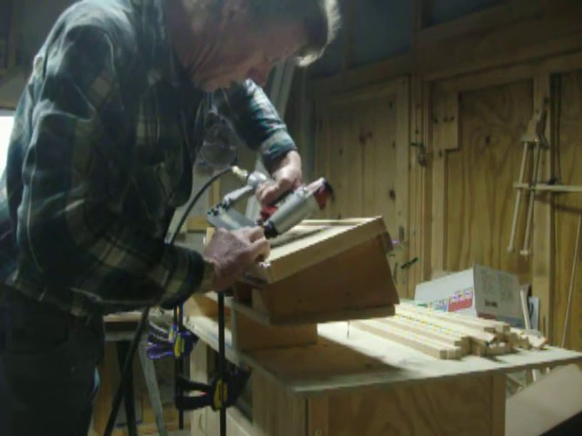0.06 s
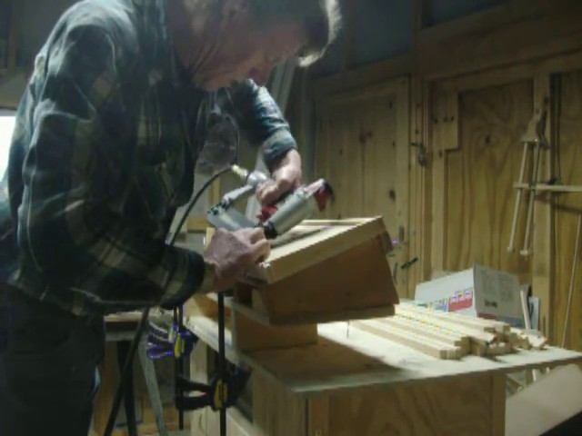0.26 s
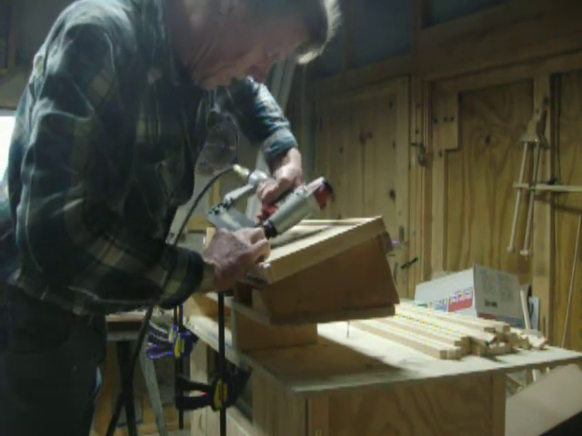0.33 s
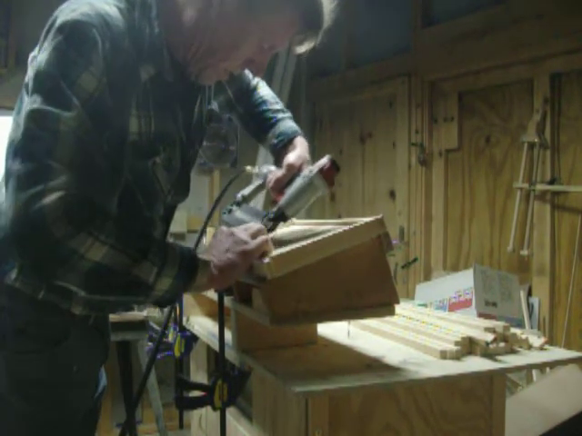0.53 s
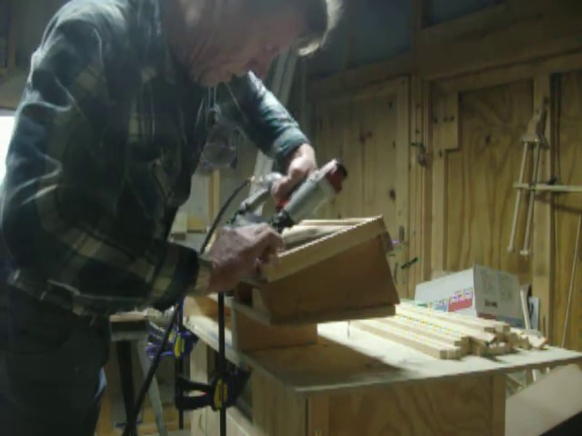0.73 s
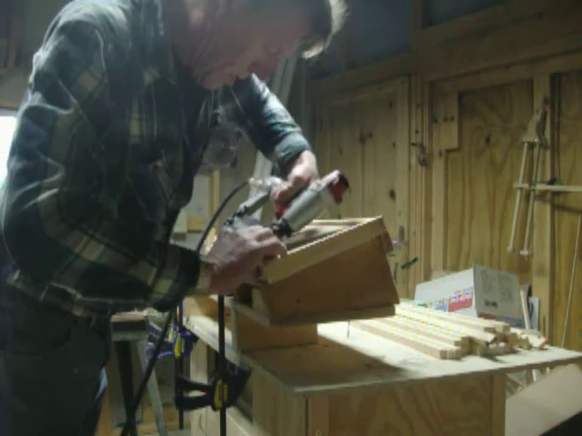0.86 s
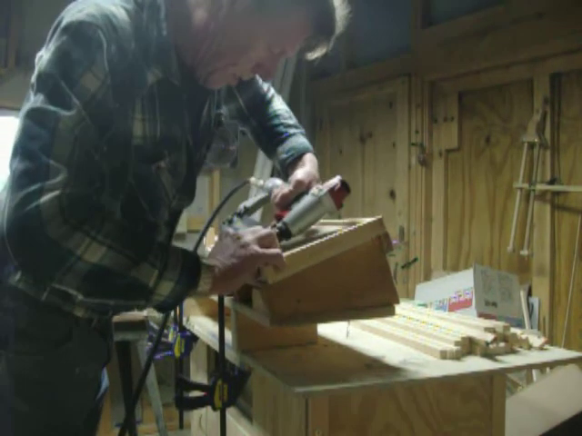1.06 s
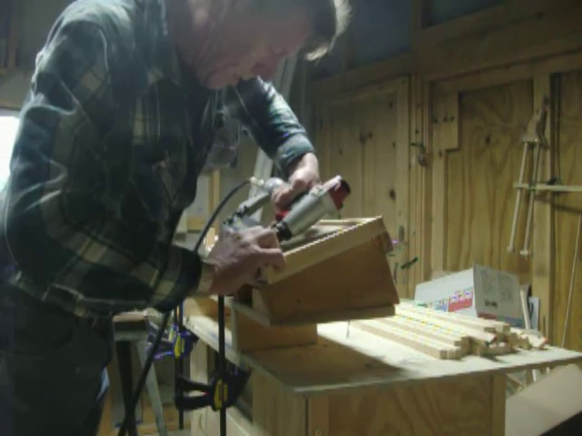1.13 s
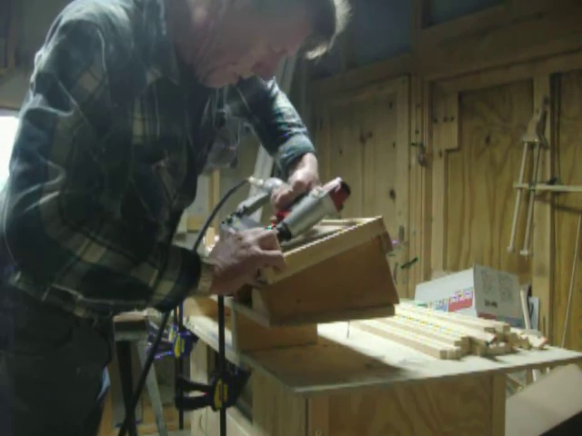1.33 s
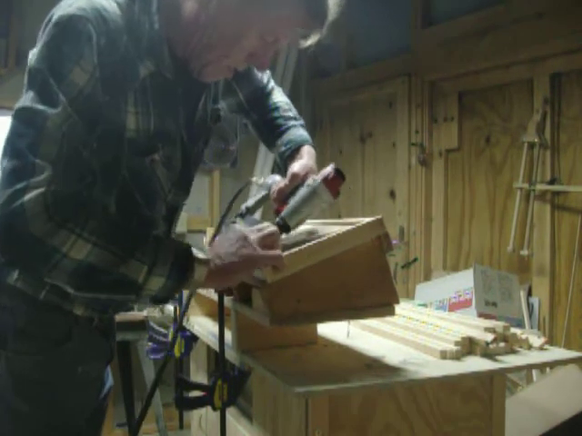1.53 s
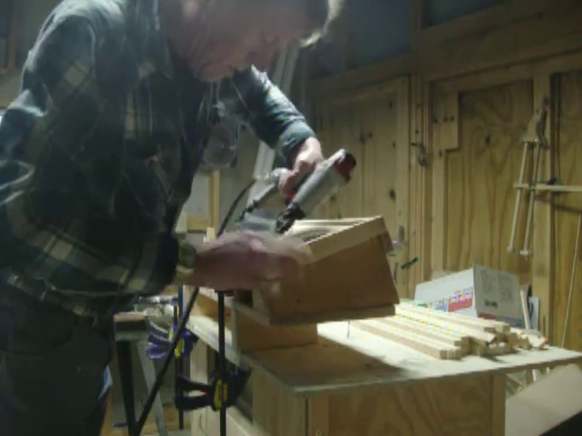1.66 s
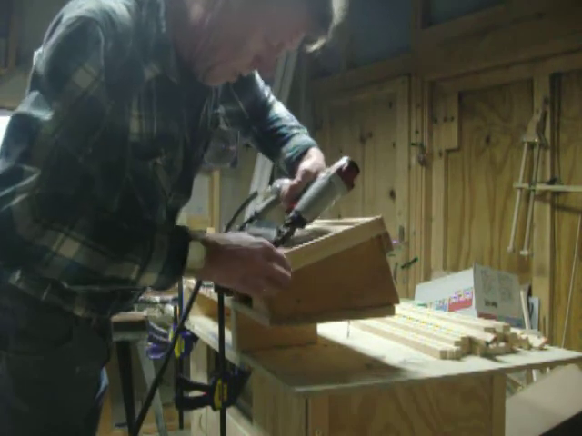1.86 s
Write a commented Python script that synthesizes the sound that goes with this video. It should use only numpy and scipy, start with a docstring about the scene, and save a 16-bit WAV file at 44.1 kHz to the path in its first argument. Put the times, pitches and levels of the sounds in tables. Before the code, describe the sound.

A pneumatic nailer fires two loud shots into a wooden frame, with scraping and knocks between

```python
"""Nailer in a plank-walled workshop

A pneumatic nailer fires twice into a wooden frame, close to a small camera's microphone.
Each shot is a jet of valve air (shaped noise), then the driver's blow (a short low ring and a noise crack);
on release the exhaust hisses and the piston bangs back. Between the shots the frame scrapes (many tiny slips)
and knocks (ringing modes), and the tool's nose clicks (sinking tones). Random reflections make the room.
The camera's gain ducks under loud sounds, and its input overloads."""
import sys
import numpy as np
from scipy import signal
from scipy.io import wavfile
from scipy.ndimage import uniform_filter1d

SR = 44100
rng = np.random.default_rng(int(sys.argv[2]) if len(sys.argv) > 2 else 0)


def ratio(d):
    """dB to gain"""
    e = np.asarray(d, float) / 20
    return 10 ** e


def unload_wav(signal):
    """Save mono or channel-first audio to the path in sys.argv[1] as 16-bit WAV at rate SR, clipped to [-1, 1]."""
    wavfile.write(
        sys.argv[1],
        SR,
        np.round(np.clip(np.atleast_2d(signal).T, -1, 1) * 32767).astype(np.int16),
    )


N = 83790  # samples in the scene

# Air of the workshop: hz, level_db per Hz
SHOP_AIR = [(25, -3), (55, -9.5), (120, -7), (240, -9.5), (330, -7.5), (450, -10.5), (700, -15),
            (1500, -19.5), (6000, -23.5)]
# Hiss of the camera's own electronics: hz, level_db per Hz
SELF_HISS = [(15, -15.5), (40, -34), (200, -12), (450, 5.5), (700, 0.5), (1500, -5), (3800, -5),
             (6000, -13.5)]
SHOP_AIR_DB, SELF_HISS_DB = -46, -47  # rms

# Bands of hiss and hum, the high ones perhaps air seeping from the tool,
# and a broad murmur leading into the scrape: start_s, length_s, centre_hz, width_hz, level_db
SEEPS = [(.92, .32, 2100, 220, -43), (.95, .14, 3050, 250, -51), (1.1, .22, 3950, 300, -48),
         (0, .21, 3950, 300, -49), (.7, .04, 1050, 900, -38), (0, .21, 245, 90, -51),
         (1.17, .14, 245, 90, -48)]

# Metal clicks of nose and trigger: start_s, level_db, pitch_hz (at the end of the rise)
CLICKS = [(0.1711, -28, 3830), (.184, -38, 3680), (0.1915, -30, 3130), (.207, -35.5, 3760),
          (0.8951, -5, 3920), (1.273, -34.5, 4200), (1.2794, -44, 4170)]
# Gritty noise in a click: hz, level_db
CLICK_GRIT = [(300, -27.5), (2000, -8.5), (2800, 0.5), (3500, -3.5), (4600, -6.5), (6000, -11.5)]
CLICK_RISE_S, CLICK_T60_S, CLICK_DROOP_HZ_PER_S = 0.0012, 0.014, 150000.0
CLICK_THUD_DB, CLICK_GRIT_DB = -16.5, -0.5  # against the click's tone

# Decay of the room: hz, t60_s
ROOM_DECAY = [(100, 0.57), (300, 0.34), (700, 0.34), (1500, 0.3), (3000, 0.32), (6000, 0.34)]
# What the walls send back: hz, gain_db
WALLS = [(60, -44.5), (150, -28), (300, -6), (600, -4), (6000, -3)]
ROOM_DB, ROOM_DELAY_S = 1.5, 0.008

# Shots: valve_opens_s, blow_delay_s, hiss_db, blow_db
SHOTS = [(.212, .0266, -5, 16), (1.3032, .026, -5, 16)]
# Releases: exhaust_opens_s, blow_delay_s, hiss_db, blow_db
RELEASES = [(.380, .0225, 11.3, 9.75), (1.4867, .0235, 11, 8.2)]
# Spectra of the air jets before the microphone: hz, level_db
VALVE_AIR = [(100, -11.5), (1000, -19.5), (2000, -15), (2700, -3.5), (3500, -7), (4500, -1), (6000, -11)]
EXHAUST_AIR = [(100, -29.5), (1000, -17.5), (1600, -29.5), (2300, -9.5), (3400, -11.5), (4500, -2.5),
               (6000, -11.5)]
VALVE_RISE_S, VALVE_T60_S, EXHAUST_RISE_S, EXHAUST_T60_S = 0.002, 0.07, 0.0019, 0.1
PUSH_S, PUSH_DB = 0.006, -20  # the valve's air pushes the microphone

# Spectra of the driver's blow and the piston's return, before the microphone: hz, level_db
DRIVE_BLOW = [(40, 16), (170, -17.5), (700, -6), (1100, -1), (1600, 2), (2400, 5.5), (3800, 10.5),
              (6000, -6.5)]
RETURN_BLOW = [(40, -20.5), (200, -10.5), (800, 2), (1400, -3.5), (2200, 6.5), (3000, 4.5), (3900, 9.5),
               (6000, -32.5)]
BLOW_T60_S, CRACK_S, CRACK_DB = 0.16, 0.00071, 6.5
SLAM_HZ, SLAM_T60_S = 967, 0.0047
DRIVE_SLAM_DB, RETURN_SLAM_DB = 10.5, 7.5  # against the blow

# Thud of the bench: hz, level_db
BENCH_THUD = [(20, -34), (60, -8), (170, 0.5), (300, -8), (600, -8.5), (6000, -78)]
THUD_T60_S, DRIVE_THUD_DB, RETURN_THUD_DB = 0.077, -6, -11.5  # dB against the blow

# Modes of the wooden frame: pitch_hz, level_db, t60_s
FRAME_MODES = [(221, -16, 0.068), (318, -2, 0.02), (426, -6.5, 0.1), (507, -5, 0.017), (650, 0.5, 0.048),
               (817, 3.5, 0.057), (947, -15, 0.09), (1142, -3.5, 0.017), (1464, -26.5, .02)]
FRAME_IN_SHOT_DB = -32  # against the blow

# The frame slides: time_s, level_db
SLIDE = [(.698, -68), (.703, -27.5), (.73, -28), (.742, -16), (.79, -25.5), (.84, -52), (.87, -64),
         (.898, -63), (.905, -23), (.96, -29.5), (1.06, -44.5), (1.1, -48)]
# Spectrum of the rasp: hz, level_db
RASP = [(60, -23), (200, -5.5), (600, 3.5), (1000, 2), (2000, -2.5), (3000, -4.5), (4000, 3), (6000, -17.5)]
SLIPS_PER_S, SLIP_SPREAD_DB = 5300, 4.5

# Knocks on the frame: start_s, level_db
KNOCKS = [(0.7365, -14.5), (0.747, -4.5), (.752, -10), (.762, -13), (0.766, -11), (.779, -7), (.786, -9),
          (0.903, -18)]
# Tone of the knocks, with the low bass filtered out: hz, gain_db
KNOCK_TONE = [(40, -47.5), (120, -4), (200, 8), (300, -0.5), (6000, -8)]
KNOCK_CONTACT_S = 0.00075

# Response of the microphone: hz, gain_db
MIC = [(20, 1.5), (60, 7), (3000, 5), (3900, 5), (4500, 2.5), (5300, -3), (8000, -9)]
# Upper band edge: hz, gain_db
BAND_EDGE = [(5000, 1), (5600, -2.5), (5900, -11), (6300, -45.5), (8000, -130)]
DUCK_FROM_DB, DUCK_SHARE, RECOVER_DB_PER_S = -11.5, 0.67, 28.5
SOFT_CEILING, HARD_CEILING = 0.49, 0.715  # amplitude, 1 = full scale

T = np.arange(SR // 4) / SR  # seconds after an event starts


def evened(x):
    """Scales to rms 1."""
    return x / np.sqrt(np.mean(x ** 2) + 1e-20)


def add(mix, start_s, sound):
    """Mixes a sound in at start_s, cut at the scene's end."""
    part = mix[round(start_s * SR):][:len(sound)]
    part += sound[:len(part)]


def colour(x, points):
    """Causal minimum-phase filter through the given (hz, dB) points."""
    hz, db = np.transpose(points)
    grid_hz = np.fft.rfftfreq(8192, 1 / SR)
    half = np.interp(np.log(grid_hz + 1), np.log(hz + 1), db) * np.log(10) / 20  # log gain
    full = np.concatenate([half, half[-2:0:-1]])
    phase = -signal.hilbert(full).imag
    taps = np.fft.ifft(np.exp(full + 1j * phase)).real[:4096]
    return signal.fftconvolve(x, taps)[:len(x)]


def coloured_noise(length, points):
    """White noise through the given spectrum, at rms 1."""
    return evened(colour(rng.standard_normal(length), points))


def curve(points):
    """Gain over the whole scene from (time_s, level_db) points."""
    s, db = np.transpose(points)
    return ratio(np.interp(np.arange(N) / SR, s, db))


def workshop_air():
    """Steady air of the workshop, as shaped noise."""
    return ratio(SHOP_AIR_DB) * coloured_noise(N, SHOP_AIR)


def self_hiss():
    """Steady shaped noise of the camera's electronics."""
    return ratio(SELF_HISS_DB) * coloured_noise(N, SELF_HISS)


def seeps():
    """Bands of hiss and hum, and a broad murmur leading into the scrape: noise swelling in and out."""
    out = np.zeros(N)
    for start_s, length_s, hz, width, db in SEEPS:
        t = np.arange(0, length_s, 1 / SR)
        band = signal.butter(1, [hz - width / 2, hz + width / 2], "bandpass", fs=SR, output="sos")
        noise = signal.sosfilt(band, rng.standard_normal(len(t)))
        noise = signal.sosfilt(band, noise)
        swell = np.sqrt(np.sin(np.pi * t / length_s))
        add(out, start_s, ratio(db) * swell * evened(noise))
    return out


def metal_clicks():
    """Taps of metal: a quickly sinking tone, grit and a one-sided bump share one short envelope."""
    out = np.zeros(N)
    decay = ratio(-60 * np.maximum(T - CLICK_RISE_S, 0) / CLICK_T60_S)
    shape = np.minimum(T / CLICK_RISE_S, 1) * decay
    for start_s, db, hz in CLICKS:
        # the phase of a tone that sinks steadily, passing hz at the end of the rise
        cycles = (hz + CLICK_DROOP_HZ_PER_S * (CLICK_RISE_S - T / 2)) * T
        tone = np.sin(2 * np.pi * cycles)
        grit = ratio(CLICK_GRIT_DB) * coloured_noise(len(T), CLICK_GRIT)
        add(out, start_s, ratio(db) * shape * (tone + grit + ratio(CLICK_THUD_DB)))
    return out


def room(x):
    """Dense random reflections, each band dying at its own speed; new ones at every call."""
    hz, t, bands = signal.stft(rng.standard_normal(SR), SR, nperseg=256)
    points_hz, t60 = np.transpose(ROOM_DECAY)
    decay = ratio(-60 * t / np.interp(hz, points_hz, t60)[:, None])
    tail = signal.istft(bands * decay, SR, nperseg=256)[1]
    delay = np.zeros(round(ROOM_DELAY_S * SR))
    tail = np.concatenate([delay, tail / np.linalg.norm(tail)])
    return ratio(ROOM_DB) * colour(signal.fftconvolve(x, tail)[:N], WALLS)


def hiss(air, rise_s, t60):
    """A jet of air that starts fast and dies as the pressure evens out."""
    return coloured_noise(len(T), air) * np.minimum(T / rise_s, 1) ** 2 * ratio(-60 * T / t60)


def push(peak_s):
    """One slow hump of air pressure, highest (1) at peak_s."""
    return T / peak_s * np.exp(1 - T / peak_s)


def blow(body, slam_db):
    """A slam as a short low ring, with a noise crack as the tool and the bench rattle out."""
    slam = ratio(slam_db - 60 * T / SLAM_T60_S) * np.sin(2 * np.pi * SLAM_HZ * T)
    rattle = ratio(-60 * T / BLOW_T60_S)
    crack = ratio(CRACK_DB) * np.exp(-T / CRACK_S)
    return slam + coloured_noise(len(T), body) * (rattle + crack)


def frame_ring():
    """The frame's modes ringing together from random phases; peak 1."""
    ring = np.zeros(len(T))
    for hz, db, t60 in FRAME_MODES:
        ring += ratio(db - 60 * T / t60) * np.sin(2 * np.pi * (hz * T + rng.random()))
    return ring / np.abs(ring).max()


def thud():
    """Low shaking of the bench, carried to the camera without the room."""
    return coloured_noise(len(T), BENCH_THUD) * ratio(-60 * T / THUD_T60_S)


def shots():
    """Valve air, then the driver's blow on the frame; near holds what reaches only the microphone."""
    out, near = np.zeros(N), np.zeros(N)
    for start_s, delay_s, hiss_db, blow_db in SHOTS:
        add(out, start_s, ratio(hiss_db) * hiss(VALVE_AIR, VALVE_RISE_S, VALVE_T60_S))
        add(near, start_s, ratio(PUSH_DB) * push(PUSH_S))
        drive = blow(DRIVE_BLOW, DRIVE_SLAM_DB)
        frame = ratio(FRAME_IN_SHOT_DB) * evened(frame_ring())
        add(out, start_s + delay_s, ratio(blow_db) * (drive + frame))
        add(near, start_s + delay_s, ratio(blow_db + DRIVE_THUD_DB) * thud())
    return out, near


def releases():
    """Exhaust air, then the piston banging back; near holds the bench's thuds."""
    out, near = np.zeros(N), np.zeros(N)
    for start_s, delay_s, hiss_db, blow_db in RELEASES:
        add(out, start_s, ratio(hiss_db) * hiss(EXHAUST_AIR, EXHAUST_RISE_S, EXHAUST_T60_S))
        add(out, start_s + delay_s, ratio(blow_db) * blow(RETURN_BLOW, RETURN_SLAM_DB))
        add(near, start_s + delay_s, ratio(blow_db + RETURN_THUD_DB) * thud())
    return out, near


def frame_slide():
    """The frame scrapes: tiny slips at random times, of random strength and direction."""
    strength = ratio(SLIP_SPREAD_DB * np.minimum(rng.exponential(1, N), 4))
    slips = strength * (rng.random(N) < SLIPS_PER_S / SR)
    slips = slips * rng.choice([-1., 1.], N)
    return curve(SLIDE) * evened(colour(slips, RASP))


def frame_knocks():
    """Soft knocks: the frame's ring smoothed by the time of contact."""
    out = np.zeros(N)
    contact = np.sin(np.pi * np.minimum(T[:400] / KNOCK_CONTACT_S, 1)) ** 2
    contact /= contact.sum()
    for start_s, db in KNOCKS:
        add(out, start_s, ratio(db) * signal.fftconvolve(frame_ring(), contact))
    return colour(out, KNOCK_TONE)


def scene():
    """Tool and handling in the room, over the air; each shot and its release get their own reflections."""
    shot, shot_near = shots()
    release, release_near = releases()
    tool = shot + release
    near = shot_near + release_near
    hands = frame_knocks() + metal_clicks() + frame_slide()
    air = workshop_air()
    first = np.arange(N) < SR  # first second: first shot and release
    tool_room = room(tool * first) + room(tool * ~first)
    mix = tool + tool_room + hands + room(hands) + near + seeps() + air
    return mix[None]


def gain_control(heard):
    """Ducks at once by a share of the excess level, then recovers at a steady rate in dB."""
    power = uniform_filter1d(heard ** 2, 200, origin=99)  # running mean of 200 samples
    power_db = 10 * np.log10(abs(power) + 1e-12)
    fall = np.arange(N) * RECOVER_DB_PER_S / SR
    held_db = np.maximum.accumulate(power_db + fall) - fall
    over_db = np.maximum(held_db - DUCK_FROM_DB, 0)
    return heard / ratio(DUCK_SHARE * uniform_filter1d(over_db, 60))


def low_pass(x):
    """Removes everything above the highest recorded frequency."""
    return signal.sosfilt(signal.butter(12, 15900, fs=SR, output="sos"), x)


def record(dry):
    """Microphone, gain control, own hiss, soft overload, band edge, then a hard ceiling."""
    heard = colour(dry[0], MIC)
    level = gain_control(heard) + self_hiss()
    overloaded = SOFT_CEILING * np.tanh(level / SOFT_CEILING)
    banded = colour(overloaded, BAND_EDGE)
    clipped = np.clip(banded, -HARD_CEILING, HARD_CEILING)[None]
    return low_pass(clipped)


dry = scene()
out = record(dry)
unload_wav(out)
```